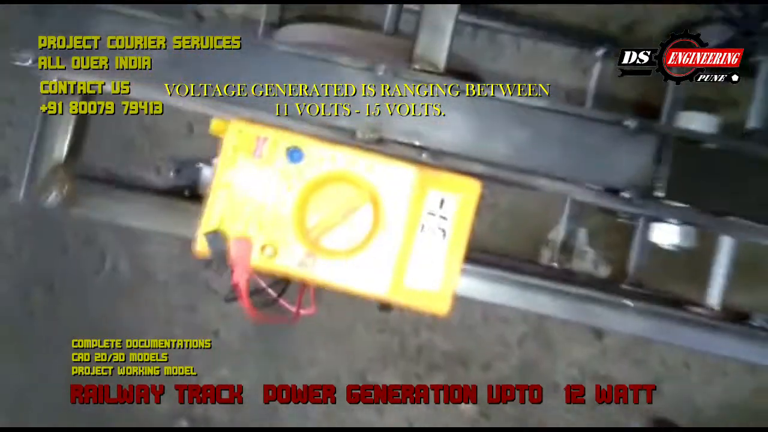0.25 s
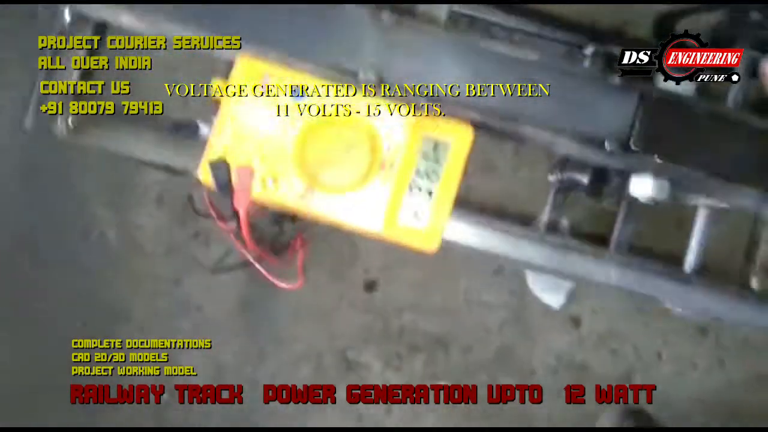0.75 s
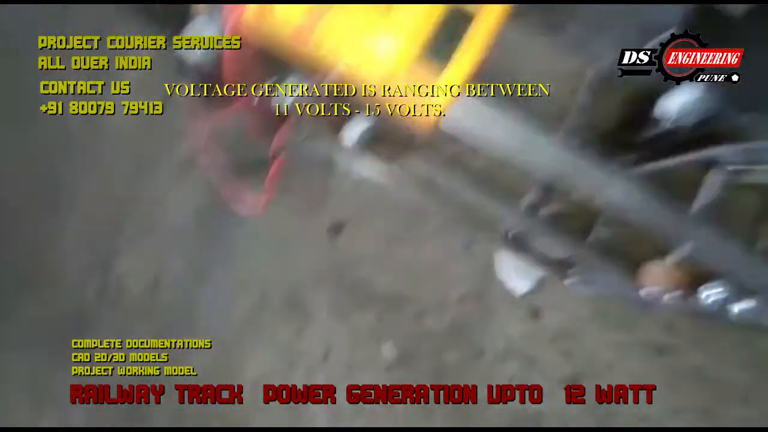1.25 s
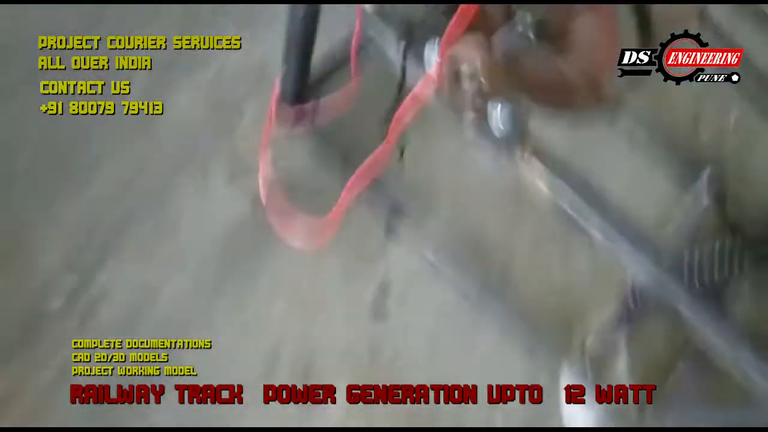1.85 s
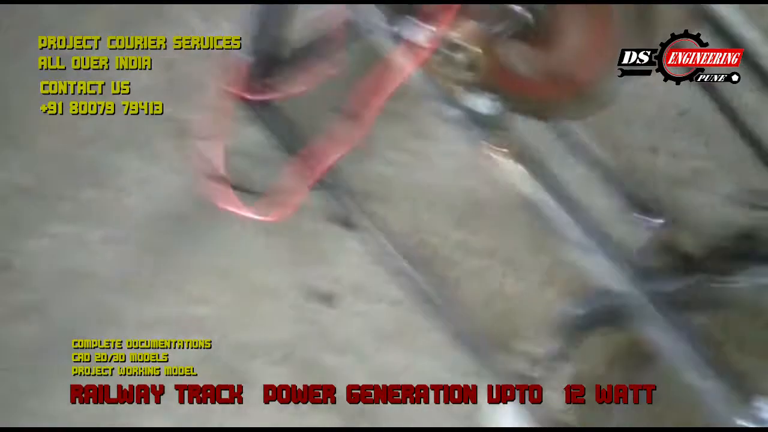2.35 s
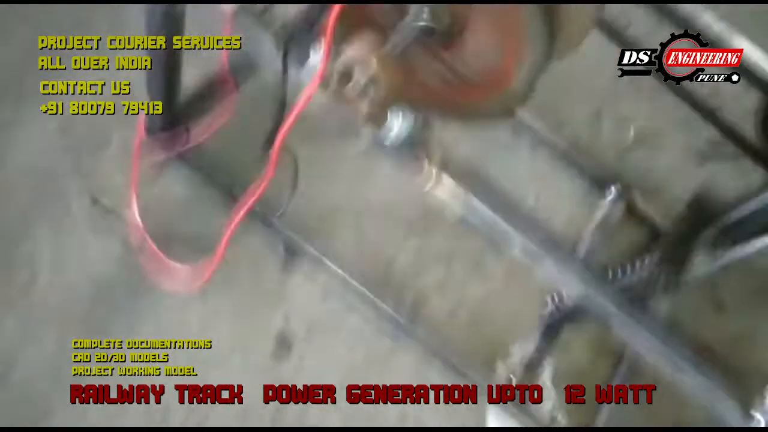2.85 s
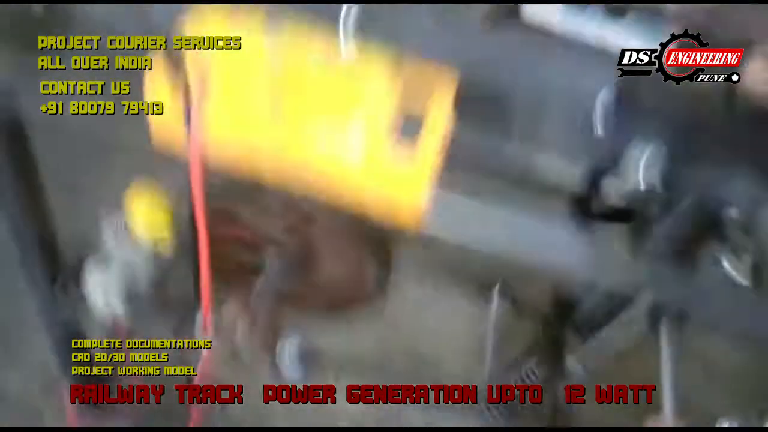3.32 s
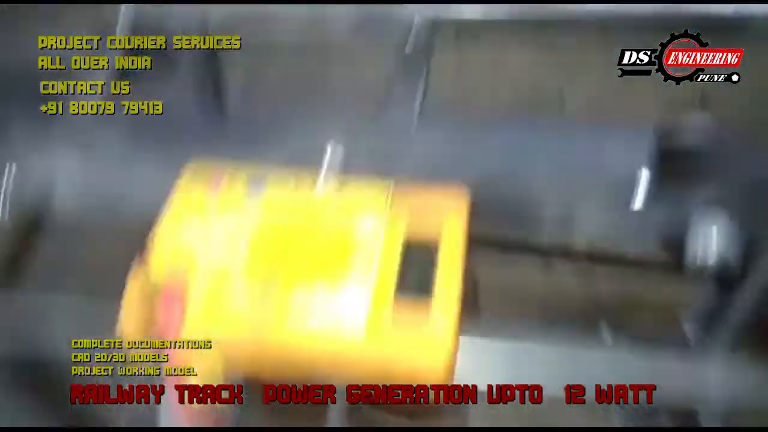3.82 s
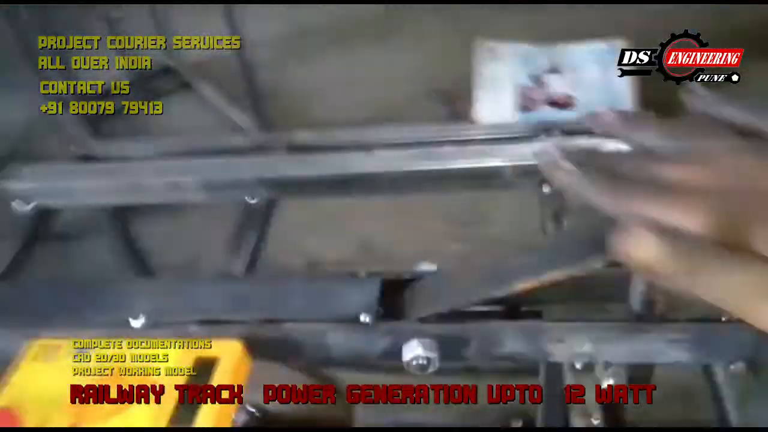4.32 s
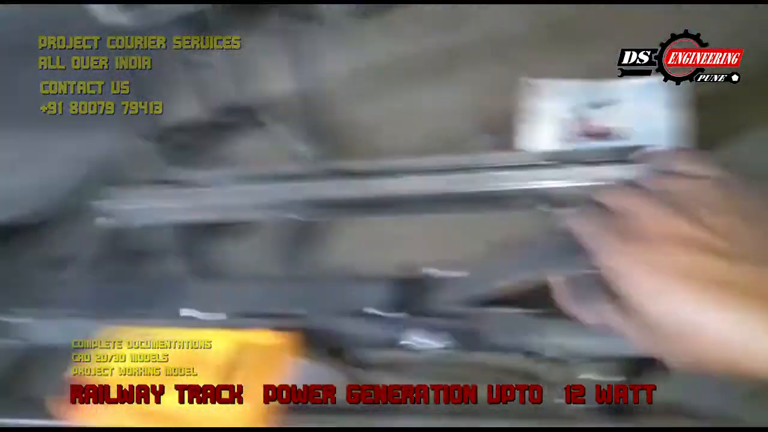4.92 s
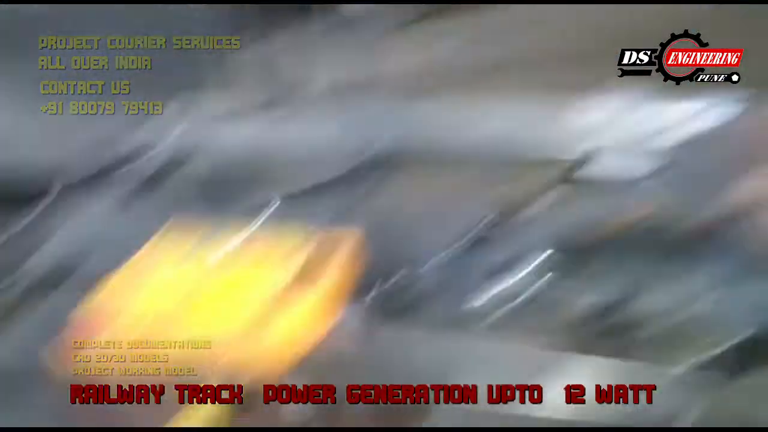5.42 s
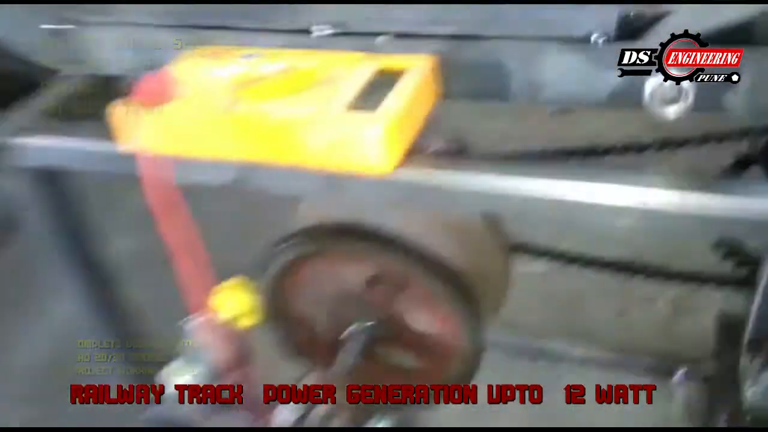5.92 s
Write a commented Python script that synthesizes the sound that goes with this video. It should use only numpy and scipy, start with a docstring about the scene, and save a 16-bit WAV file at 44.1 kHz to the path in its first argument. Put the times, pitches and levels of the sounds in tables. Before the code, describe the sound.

From the start, the teeth and links of a hand-driven rack, chain and flywheel strike irregularly, several times a second, close to a small mono microphone. Each bright clank leaves thin steel ringing briefly over the uneven whirr of the chain and a faint gear whine. At about 1.1 seconds a freewheel ticks very fast for roughly half a second. Strong clanks continue until about 2.5 seconds, then thin out. From 4 seconds they are softer and the whirr drops, while a faint rough tone swells and climbs in pitch far off. Just before 6 seconds two hard blows land almost together, the loudest moment, and the chain rattle surges briefly. Throughout, another machine drones low and steady further back with a quick throb, and the workshop adds a short echo.

```python
"""A hand-driven rack, chain and flywheel of thin steel, close to a small mono microphone in a workshop.
From the start, teeth and links strike and leave the steel ringing over the whirr of the running chain.
Just after one second the freewheel pawl ticks fast for a moment. From four seconds the clanks are softer
and a rough tone climbs far off; two hard blows land near six seconds. All the while a steady machine
drones further back in the room, throbbing once for each turn of its shaft."""
import sys
import numpy as np
from scipy import signal
from scipy.fft import rfft, irfft
from scipy.io import wavfile
from scipy.ndimage import uniform_filter1d

SR = 44100
rng = np.random.default_rng(int(sys.argv[2]) if len(sys.argv) > 2 else 0)


def wrap_up_sound(samples):
    """Save the sound to the file named by the first command line argument, as 16-bit audio."""
    columns = np.atleast_2d(samples).T
    # keep every value between -1 and 1, then stretch to whole-number steps
    tamed = np.clip(columns, -1, 1)
    steps = np.round(tamed * 32767).astype(np.int16)
    wavfile.write(sys.argv[1], SR, steps)


N = 272094

# Teeth and links striking, close up. Each row: start in seconds, level in dB, then body, upper body
# and top in dB against the middle register, decay time in seconds.
BLOWS = [(0.1042, -16, -12, -1, -4, 0.2), (0.201, -20, -13, -6.5, -15, 0.074),
         (0.3367, -9.5, -12, -17, -3.5, 0.1), (0.4934, -21, -14, -17, -1.5, 0.11),
         (0.5661, -31.5, -9, 2, -4, 0.27), (0.6505, -21.5, -22, -23, -4, 0.14),
         (0.6712, -11, -8, -1.5, -1.5, 0.11), (0.833, -21, -35, -27, -3, 0.084),
         (0.8545, -30, -15, -27, -18, 0.13), (0.894, -9, -12.5, -11, -2.5, 0.065),
         (0.998, -15.5, -26, -26, -6, 0.1), (1.0306, -15, -25, -6.5, -8.5, 0.19),
         (1.1882, -31, -18, -27, 5, 0.11), (1.2453, -11, -12.5, -5.5, -5, 0.14),
         (1.494, -19, -11.5, -6, -3, 0.11), (1.8357, -13.5, -8, -6, -6, 0.16),
         (1.8734, -22, -21, -17, -10, 0.12), (1.936, -25.5, -20, -3, 1, 0.082),
         (2.113, -12.5, -13, -8, -3.5, 0.069), (2.1484, -33.5, -4, 0, -22, 0.12),
         (2.3476, -17, -19, -13, -32, 0.086), (2.4753, -10, -12, -8, -5, 0.13),
         (2.53, -26, -13, -14, -3, 0.42), (2.793, -23, -23, -11.5, -10, 0.21),
         (2.929, -31, -11, -13, -10, 0.1), (3.1435, -17, -11.5, -0.5, -6, 0.18),
         (3.2645, -24, -10.5, -7, -4, 0.075), (3.5808, -29, -28, -0.5, -7, 0.083),
         (3.8864, -27, -12, -6, -1, 0.11), (4.013, -30.5, -10, -6, -7, 0.17),
         (4.3755, -31.5, -9, 1.5, -16, 0.096), (4.785, -35, -12, -6, -10, 0.2),
         (5.015, -22.5, -20, -7, -12, 0.11), (5.262, -23.5, -19, -6.5, -5, 0.053),
         (5.3644, -29.5, -7, -24, 2.5, 0.047), (5.475, -20, -15.5, -6.5, -10, 0.17),
         (5.6261, -40, -15, -15, -12, 0.1), (5.762, -29, -14, -5, -17, 0.16),
         (5.944, -3, -17.5, -17, -20, 0.1), (5.9597, -8, -10.5, -3, -8, 0.12)]
# High modes of the struck steel. Each row: pitch in Hz, relative level in dB, decay in seconds (capped).
STEEL_MODES = [(4420, -27, 0.09), (4830, -15, 0.26), (4940, -38, 0.044), (5700, -29, 0.13),
               (5530, -25, 0.17), (6220, 12.5, 0.033), (5930, 3.5, 0.027), (6740, -23, 0.53),
               (7200, -44, 0.31)]
# Lower ring of the frame. Each row: pitch in Hz, relative level in dB, nominal decay in seconds.
RAIL_MODES = [(1018, -9.5, 0.23), (1225, -2.5, 0.14), (1730, -14, 0.44), (2010, -3.5, 0.24),
              (2485, 1.5, 0.53), (2730, -4, 0.13), (2940, 0.5, 0.19), (3219, -12, .21), (3365, -9, 0.17),
              (4260, -7, 0.17)]
# Single parts ringing clear. Each row: start in seconds, pitch in Hz, level in dB, decay in seconds.
PART_PINGS = [(.206, 2480, -37, 0.067), (.432, 714, -43, .14), (0.761, 2440, -48, 0.15),
              (0.851, 6100, -27, 0.066), (0.896, 1238, -46, 0.24), (0.112, 2492, -38, 0.53),
              (1.839, 4060, -26, 0.068), (1.838, 5920, -29.5, 0.23), (2.114, 1035, -41.5, 0.083),
              (2.22, 6739, -42.5, 0.28), (2.29, 2896, -46.5, 0.2), (2.345, 2236, -40.5, 0.12),
              (2.464, 2880, -54, 0.27), (2.719, 2920, -49, .2), (2.795, 4940, -46, .12),
              (2.814, 2915, -44.5, .11), (3.034, 2906, -44, .2), (3.328, 2840, -46.5, 0.26),
              (3.726, 3010, -49, 0.11), (4.132, 1810, -45, 0.1), (4.779, 2870, -50.5, 0.076),
              (5.926, 2583, -45, .48), (5.939, 894, -12, 0.015), (5.957, 920, -37, 0.026)]
# Running chain and gears. Each row: time in seconds, level in dB, then body, upper body and top
# in dB against the middle register.
CHAIN_RUN = [(0, -43.5, -7.5, -9, -1), (.1, -42.5, -13, -12, -1), (.29, -46.5, -10, -14, -5),
             (.42, -41.5, -13, -9.5, -10), (.68, -45, -8.5, -10, 0.5), (.81, -49.5, -6.5, -9, -1),
             (1, -37.5, -12.5, -14, -13), (1.17, -44, -10, -10, -2), (1.32, -36, -19.5, -17, -5),
             (1.5, -47, -15, -13, 1.5), (1.7, -43.5, -8, -6, 0), (1.8, -52, -4, -2, -3),
             (1.9, -44, -13.5, -21, -5), (2.05, -49.5, -12.5, -4, -10), (2.45, -46.5, -5, -7, -1.5),
             (2.7, -60.5, -2, -6, -8), (2.82, -45.5, -9, -17, -22), (2.91, -64, -5.5, -7, -9),
             (3.07, -44, -11.5, -6.5, -9), (3.28, -54, -5, -1, -5), (3.43, -62, -10, -7, -7),
             (3.6, -47, -10, -8, -2.5), (3.85, -52.5, -9.5, -7, -1.5), (4, -50, -10, -1.5, -1.5),
             (4.12, -57, -6, -10, -0.5), (4.48, -58.5, -0.5, -7, -1), (4.68, -63.5, -2.5, 2, -1.5),
             (5.05, -59.5, -3.5, -9, 0.5), (5.4, -55.5, -3, -7.5, -24), (5.65, -49, -13, -8, -11),
             (5.82, -46, -12.5, -7.5, 0), (5.95, -36.5, -15, -10, -8), (6.17, -48.5, -6.5, -4, -7)]
# The frame singing under the whirr. Each row: pitch in Hz, width in Hz, relative level in dB.
FRAME_SONG = [(2100, 9.7, -32), (2440, 18, -22), (6500, 41, -23), (6720, 61, 12), (12800, 370, -40)]
# Steel noise through the microphone port. Each row: frequency in Hz, relative level in dB.
STEEL_SPECTRUM = [(350, -62), (600, -8.5), (1260, -6), (1480, -6.5), (1630, -3.5), (2600, -3), (2900, -5),
                  (3600, -8.5), (4170, -4.5), (4590, -5), (6960, 7.5), (11000, -13), (13100, -15),
                  (14200, -15), (15000, -83)]
# High treble of the close machine. Each row: time in seconds, gain in dB.
TREBLE_GAIN = [(0, -3), (.6, -0.5), (1.5, 2), (2, 2.5), (2.5, -5.5), (3, 5), (4, -4), (4.5, 4), (5, -3.5),
               (5.4, 0.5), (5.8, -9), (6.17, -6.5)]
# The far machine's drone. Each row: multiple of the shaft speed, relative level in dB.
SHAFT_ORDERS = [(5, -68.0), (6, -72.0), (7, -65.0), (8, -66.0), (13, -74.0), (16, -70.0), (17, -68.0),
                (18, -71.0), (19, -63.0), (20, -61.0), (21, -60.0), (22, -52.0), (23, -56.0), (24, -59.0),
                (25, -67.0), (29, -69.0), (30, -69.0), (33, -67.0), (34, -64.0), (35, -61.0), (36, -60.0),
                (37, -70.0), (38, -66.0), (39, -69.0), (41, -71.0), (44, -65.0), (45, -66.0), (46, -69.0),
                (47, -67.0), (48, -69.0)]
# Room tone of the workshop. Each row: frequency in Hz, relative level in dB.
AIR_SPECTRUM = [(15, -49), (25, -8), (75, 11), (146, -0.5), (257, 7.5), (354, 5.5), (543, -2), (1000, -1),
                (1150, -7), (2070, -16), (3830, -103.5), (6720, -75), (8780, -116), (12800, -7.5),
                (15000, -28)]
# Boomy resonances of the room. Each row: pitch in Hz, width in Hz, level in dB against the room tone.
ROOM_MODES = [(83.6, 40, -1.5), (263, 27, -8.5), (420, 107, -7.5), (554.3, 26, -5.5), (736, 63, -11),
              (995.5, 19, -12), (1885, 130, -16), (2000, 200, -19)]
# Low end of the background. Each row: time in seconds, then levels in dB below 140 Hz,
# from 140 to 320 Hz, from 320 to 490 Hz and from 490 to 800 Hz.
LOW_BAND_LEVELS = [(0.0, -75, -55.5, -59, -63), (0.08, -65, -53, -56.5, -54.5),
                   (0.46, -58.5, -52, -53, -54), (0.86, -57, -52.5, -54, -64.5),
                   (1.36, -60.5, -50.5, -54, -53), (1.92, -53.5, -51, -54, -59.5),
                   (2.27, -65.5, -50, -57, -68), (2.73, -55.5, -48.5, -59, -55),
                   (3.68, -64, -49.5, -59.5, -59), (3.85, -55, -46, -52.5, -56.5),
                   (4.19, -54.5, -51.5, -51.5, -60), (4.4, -60.5, -49, -51, -57),
                   (5.21, -54, -45.5, -59.5, -52.5), (5.53, -68.5, -47.5, -67, -52),
                   (6.15, -59.5, -50, -63, -56), (6.17, -61, -55, -63, -52)]

SHAFT_HZ, BEAT_S = 11.705, .057  # the far machine's shaft speed and the time of its first throb


def clanks():
    """Teeth and links strike close by: each blow chatters, dies away and leaves the steel ringing."""
    envelopes = blow_envelopes()
    body, _, middle, _ = envelopes
    contacts = patchy(grit(lumpy_db=1.37, span_s=.003), patch_db=2.6)
    chatter = (registers(contacts) * envelopes).sum(0)
    return chatter + gain_of(-23) * (steel_ring(middle) + rail_ring(body))


def blow_envelopes(crest_db=13, chatter_share=.027, soft_rise_s=.0013, soft_db=-29):
    """Each blow swells, holds briefly and fades in four registers; weak blows swell more slowly."""
    power, t = np.zeros((4, N)), np.arange(SR // 2) / SR
    lag_s = np.array([[.004], [.002], [.0012], [.003]])  # the body swells later than the treble
    fade_rate = np.array([[.9], [.95], [1], [1.2]])  # the top dies first
    for start, db, body_db, upper_db, top_db, t60 in BLOWS:
        rise = 1 - np.exp(-t / (lag_s + soft_rise_s / (1 + gain_of(db - soft_db))))
        fall_db = -60 * np.maximum(t - chatter_share * t60, 0) / t60 * fade_rate
        register_db = np.array([[body_db], [upper_db], [0], [top_db]])
        shape = rise * gain_of(db - crest_db + register_db + fall_db)
        part = power[:, round(start * SR):][:, :len(t)]
        part += shape[:, :part.shape[1]] ** 2
    return np.sqrt(power)


def steel_ring(envelope, longest_s=.13):
    """Thin steel rings high; each blow lands elsewhere and favours other modes."""
    drive, ring = envelope * rng.standard_normal(N), np.zeros(N)
    for (hz, db, t60), favour in zip(STEEL_MODES, wander(2.3, count=len(STEEL_MODES))):
        width = 2.2 / min(t60, longest_s)
        ring += gain_of(db + 7.5 * favour) * resonate(drive, hz, width) / np.sqrt(width / SR)
    return ring


def rail_ring(envelope):
    """The frame rings lower, shaken by the blows and by the running chain."""
    run_db, body_db = curve(CHAIN_RUN)[:2]
    drive = (envelope + gain_of(run_db + body_db - 2)) * rng.standard_normal(N)
    return sum(gain_of(db + 3 * favour) * resonate(drive, hz, 3.9 / t60) * np.sqrt(t60 * SR)
               for (hz, db, t60), favour in zip(RAIL_MODES, wander(5.6, count=len(RAIL_MODES))))


def pings(rise_cycles=5.1):
    """Single loose parts ring with dying tones, roughened by their shaking."""
    tones, t = np.zeros(N), np.arange(SR // 2) / SR
    shake = evened(resonate(rng.standard_normal(N), hz=0, width=87))
    for start, hz, db, t60 in PART_PINGS:
        rise = 1 - np.exp(-t * hz / rise_cycles)
        tone = np.sin(2 * np.pi * hz * t) * rise * gain_of(db - 60 * t / t60)
        part = tones[round(start * SR):][:len(t)]
        part += tone[:len(part)]
    return tones * (1 + .83 * shake)


def whirr(surge_db=1.5, surges_per_s=9):
    """Chain and gears run unevenly: dense small contacts, with the frame singing among them."""
    run_db, body_db, upper_db, top_db = curve(CHAIN_RUN)
    level = gain_of(run_db + surge_db * wander(surges_per_s)[0])
    contacts = patchy(grit(lumpy_db=1.2, span_s=.0061), patch_db=2.4) + gain_of(-8) * links()
    hiss = registers(contacts) * gain_of([body_db, upper_db, np.zeros(N), top_db])
    drive = rng.standard_normal(N)
    song = sum(gain_of(db + 13 * flicker.clip(-2, 1.2)) * evened(resonate(drive, hz, width))
               for (hz, width, db), flicker in zip(FRAME_SONG, wander(7.5, count=len(FRAME_SONG))))
    return level * (hiss.sum(0) + gain_of(-23.5) * song)


def links(per_s=400, pitches=30, t60=.028):
    """Chain links clink at random, each a brief ring at its own pitch."""
    hits = gain_of(2.5 * np.minimum(rng.exponential(1, N), 3)) * (rng.random(N) < per_s / SR)
    which, t = rng.integers(0, pitches, N), np.arange(1200) / SR
    fade = gain_of(-60 * t / t60) * (1 - np.exp(-t / .0006))
    clinks = np.zeros(N)
    for k, hz in enumerate(np.geomspace(1500, 12000, pitches)):
        clinks += signal.oaconvolve(hits * (which == k), np.sin(2 * np.pi * hz * t) * fade)[:N]
    return evened(clinks)


def pawl(start_s=1.13, rise_s=.071, hold_s=.34, ticks_per_s=240, ring_hz=7200):
    """The freewheel pawl catches, holds and lets go: quick uneven ticks, each a short bright ring."""
    t = np.arange(N) / SR - start_s - rise_s
    db = -31.5 - 8 * t - 132 * np.maximum(t - hold_s, 0)  # a slow sag, then a fast fall
    level = (1 + t / rise_s).clip(0, 1) ** 3 * gain_of(db)
    teeth_passed = np.cumsum(ticks_per_s * (1 + .5 * wander(90)[0]).clip(.1)) / SR
    force = gain_of(3.3 * rng.standard_normal(N).clip(-3, 1.5))
    ticks = (np.diff(np.floor(teeth_passed), prepend=0) > 0) * force
    bursts = signal.lfilter([1], [1, -np.exp(-1 / (.0007 * SR))], ticks) * rng.standard_normal(N)
    ring = evened(resonate(resonate(bursts, ring_hz, 650), ring_hz, 1100))
    upper_ring = evened(resonate(bursts, hz=8060, width=420))
    return level * (ring + gain_of(-8.5) * upper_ring)


def gear_whine(hz=2898, swell_share=.42):
    """The gear mesh whines: a narrow band of noise that comes in fits and swells with the whirr."""
    db = -67.5 + swell_share * (curve(CHAIN_RUN)[0] + 50) + 2.7 * wander(12)[0]
    return gain_of(db) * evened(resonate(resonate(rng.standard_normal(N), hz, 62), hz, 110))


def drone():
    """The far machine hums at multiples of its shaft speed; those near the strongest throb together."""
    t = np.arange(N) / SR - BEAT_S
    strongest = max(SHAFT_ORDERS, key=lambda row: row[1])[0]
    drift, hum = wander(1.1, count=2 * len(SHAFT_ORDERS)), np.zeros(N)
    for (order, db), phase_drift, level_drift in zip(SHAFT_ORDERS, drift[::2], drift[1::2]):
        apart = abs(order - strongest)
        scatter = -.3 * apart ** 3 if apart < 4 else rng.uniform(-np.pi, np.pi)
        phase = 2 * np.pi * order * SHAFT_HZ * t + scatter + .42 * phase_drift
        hum += np.sqrt(2) * gain_of(db + 1.38 * level_drift) * np.cos(phase)
    return hum


def climbing_tone(start_s=4.08, length_s=1.93, start_hz=440, hz_per_s=137):
    """Far off, a rough tone swells, rises in pitch and fades."""
    t = (np.arange(N) / SR - start_s).clip(0, length_s)
    band = resonate(rng.standard_normal(N), start_hz + hz_per_s * t, width=90)
    return gain_of(-59) * evened(band) * np.sin(np.pi * t / length_s)


def workshop():
    """Room tone: air, and boomy resonances that pulse with the far machine's shaft."""
    air, drive = colour(rng.standard_normal(N), AIR_SPECTRUM), rng.standard_normal(N)
    boom = sum(gain_of(db + 1.14 * swell) * evened(resonate(resonate(drive, hz, width), hz, width * 2))
               for (hz, width, db), swell in zip(ROOM_MODES, wander(6.9, count=len(ROOM_MODES))))
    throb = 1 + .35 * np.cos(2 * np.pi * SHAFT_HZ * (np.arange(N) / SR - BEAT_S))
    return gain_of(-56) * (air + boom * throb)


def reverb(x, t60=.42):
    """The room answers with a diffuse tail, 6 ms behind the direct sound."""
    t = np.arange(SR // 2) / SR
    tail = rng.standard_normal(len(t)) * gain_of(-60 * t / t60) * (t > .006)
    return signal.oaconvolve(x, tail / np.linalg.norm(tail))[:N]


def vary_treble(x):
    """The high treble brightens and dulls."""
    low, high, top = split(x, [7600, 11800])
    return low + high * gain_of(curve(TREBLE_GAIN)[0]) + top


def vary_lows(x):
    """Sets four low bands to their changing levels and passes the rest."""
    *lows, rest = split(x, [140, 320, 490, 800])
    return rest + sum(gain_of(db) * evened(band) for db, band in zip(curve(LOW_BAND_LEVELS), lows))


def grit(lumpy_db, span_s):
    """Noise whose level jumps about, as many small contacts."""
    lumps = evened(uniform_filter1d(rng.standard_normal(N), round(span_s * SR)))
    return evened(rng.standard_normal(N) * gain_of(lumpy_db * lumps))


def patchy(x, patch_db):
    """Lets small regions of pitch and time come and go."""
    spectra = signal.stft(x, nperseg=256, noverlap=192)[2]
    patches = uniform_filter1d(rng.standard_normal(spectra.shape), size=5, axis=0)
    patches = evened(uniform_filter1d(patches, size=16, axis=1))
    return evened(signal.istft(spectra * gain_of(patch_db * patches), nperseg=256, noverlap=192)[1][:N])


def registers(x):
    """Colours noise as steel and splits it into body, upper body, middle and top, each of rms 1."""
    return np.array([evened(band) for band in split(colour(x, STEEL_SPECTRUM), [3150, 5350, 9300])])


def split(x, edges_hz):
    """Bands of x below, between and above the edges."""
    spectrum, hz = rfft(x), np.fft.rfftfreq(len(x), 1 / SR)
    below = [1 / (1 + (hz / edge) ** 12) for edge in edges_hz]
    return np.array([irfft(spectrum * (b - a), len(x)) for a, b in zip([0] + below, below + [1])])


def colour(x, points):
    """Shapes x by a spectrum that keeps white noise at its level."""
    point_hz, db = np.transpose(points)
    hz = np.fft.rfftfreq(len(x), 1 / SR)
    gains = evened(gain_of(np.interp(np.log(hz + 1), np.log(point_hz + 1), db)))
    return irfft(rfft(x) * gains, len(x))


def resonate(x, hz, width):
    """A resonance, width in Hz; a moving one shifts hz down to zero, smooths, and shifts back."""
    r = np.exp(-np.pi * width / SR)
    if np.ndim(hz) == 0:
        return 2 * signal.lfilter([1 - r], [1, -r * np.exp(2j * np.pi * hz / SR)], x + 1e-18).real
    turn = np.exp(2j * np.pi * np.cumsum(hz) / SR)
    return 2 * (turn * signal.lfilter([1 - r], [1, -r], x / turn + 1e-18)).real


def wander(per_s, count=1):
    """Slow random curves of rms 1."""
    steps = rng.standard_normal((count, N // 256 + 2))
    slow = uniform_filter1d(steps, max(round(SR / 256 / per_s), 1), axis=1)
    return [np.interp(np.arange(N) / 256, np.arange(len(row)), evened(row)) for row in slow]


def curve(rows):
    """Columns of a table, joined in time."""
    times, *columns = np.transpose(rows)
    return [np.interp(np.arange(N) / SR, times, column) for column in columns]


def evened(x):
    """Scales x to rms 1."""
    return x / np.sqrt(np.mean(x ** 2) + 1e-20)


def gain_of(db):
    return 10 ** (np.asarray(db) / 20)


def scene():
    """One microphone position: the hand-driven machine up close, the workshop behind it."""
    strikes = clanks() + pawl() + pings()
    close = vary_treble(strikes + gain_of(-9) * reverb(strikes) + whirr()) + gear_whine()
    background = vary_lows(drone() + workshop() + climbing_tone())
    mono = close + background
    return np.array([mono, mono])


def record(dry, ceiling=.28, edge_hz=14500):
    """The recorder softly squashes the peaks and cuts off the highest treble."""
    squashed = ceiling * np.tanh(dry / ceiling)
    lowpass = signal.firwin(255, edge_hz, window=("kaiser", 8), fs=SR)
    return signal.oaconvolve(squashed, lowpass[None], "same")


dry = scene()
out = record(dry)
wrap_up_sound(out)
```